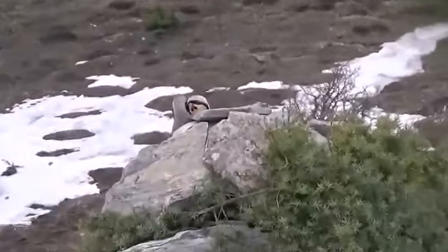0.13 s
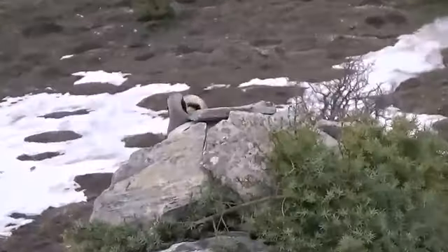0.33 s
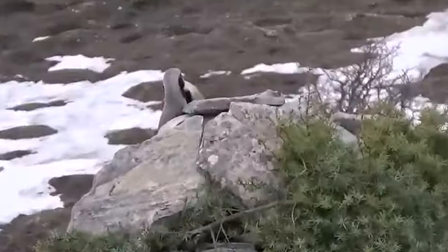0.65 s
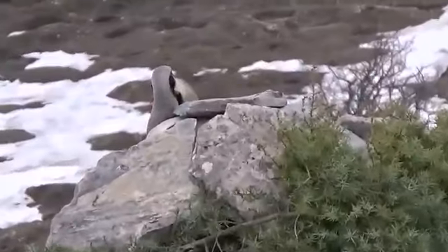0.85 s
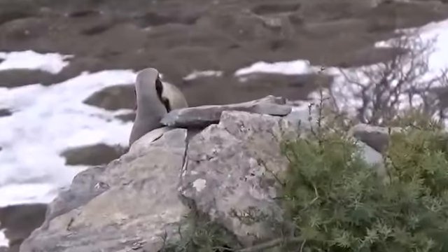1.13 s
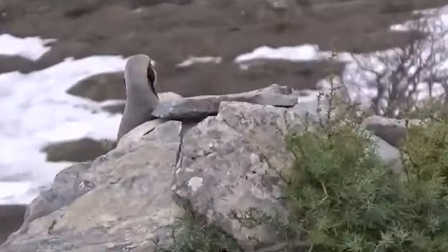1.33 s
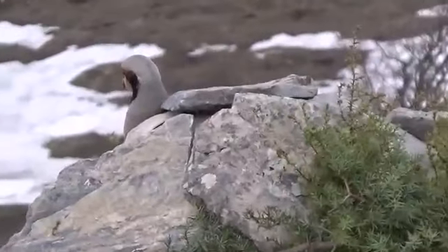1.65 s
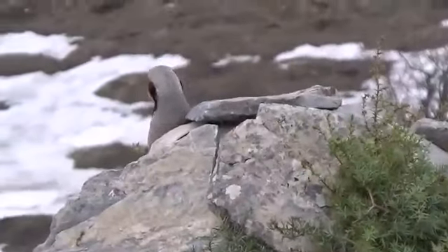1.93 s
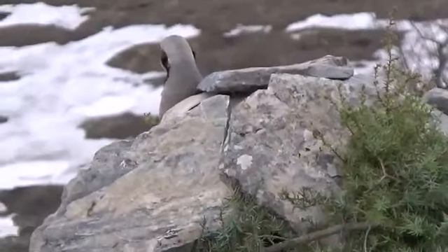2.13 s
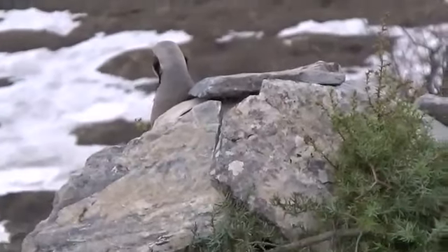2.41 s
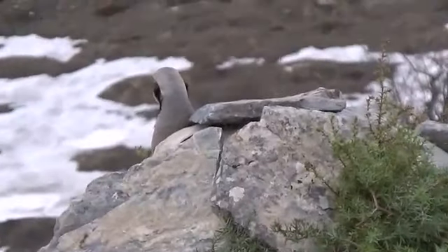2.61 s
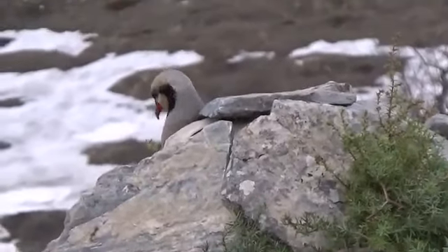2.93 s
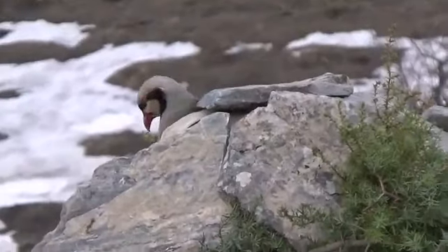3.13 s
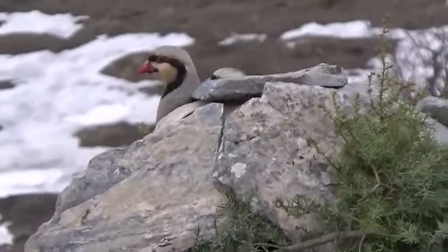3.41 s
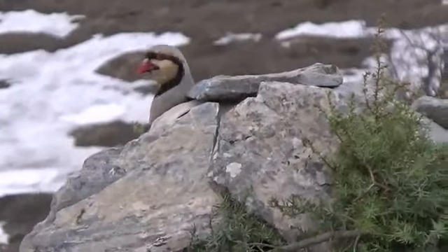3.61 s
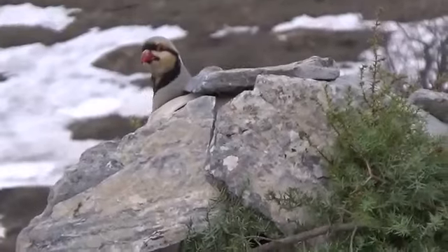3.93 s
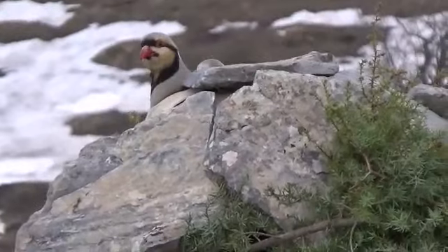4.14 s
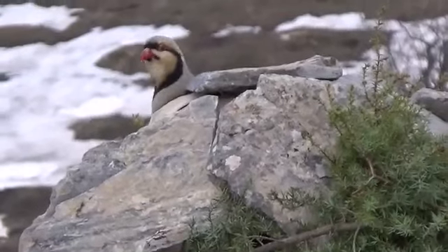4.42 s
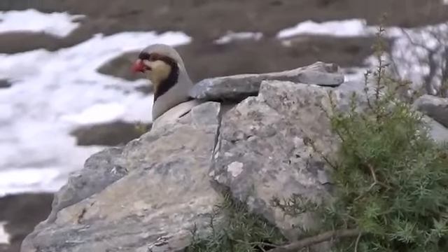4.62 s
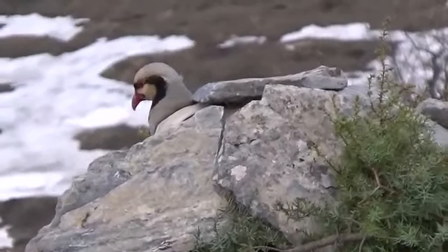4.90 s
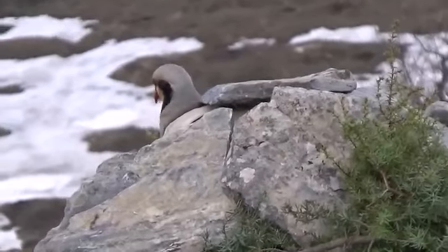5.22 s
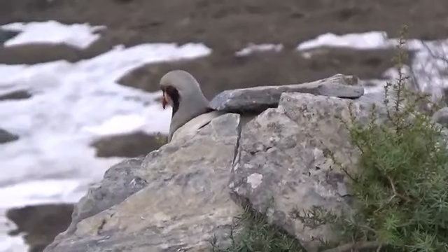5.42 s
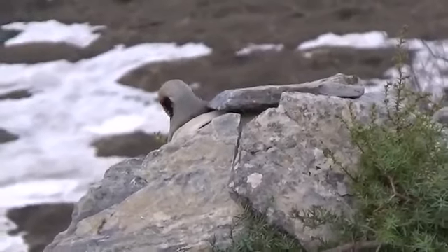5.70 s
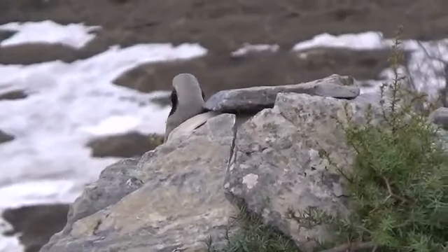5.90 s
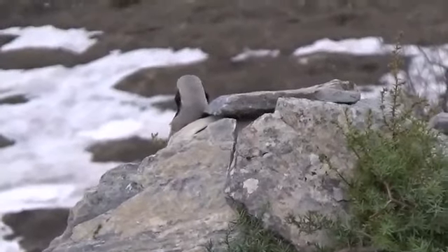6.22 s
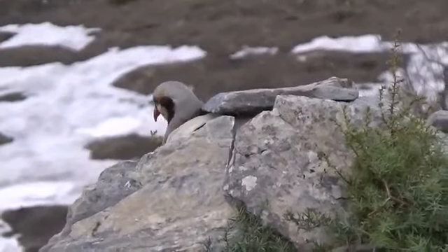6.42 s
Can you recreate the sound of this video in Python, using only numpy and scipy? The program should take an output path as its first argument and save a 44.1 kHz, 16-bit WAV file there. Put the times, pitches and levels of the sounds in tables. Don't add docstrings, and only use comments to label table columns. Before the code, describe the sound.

Two partridges trade harsh, rasping whistled notes across a quiet open mountainside, the louder bird fading while faint hiss and sharp camera ticks continue.

```python
import sys
import numpy as np
from scipy import signal
from scipy.fft import rfft, irfft, next_fast_len
from scipy.io import wavfile
from scipy.ndimage import uniform_filter1d

SR = 44100
rng = np.random.default_rng(int(sys.argv[2]) if len(sys.argv) > 2 else 0)


def wav_out(sig):
    wavfile.write(sys.argv[1], SR, np.round(np.clip(np.atleast_2d(sig).T, -1, 1) * 32767).astype(np.int16))


def how_loud(loudness_db):
    steps = np.asarray(loudness_db, float) / 20
    return 10 ** steps


N = 288855

# f/Hz, level/dB
THROAT = [(900, -85), (1300, -6.5), (1600, 1), (2600, 2.5), (3600, 10.5), (4200, -5.5), (4800, 0.5),
          (6000, -9), (6600, -19), (8200, -5), (11000, -5.5)]
IDLE_SLIPS = 65


def evened(x):
    return x / np.sqrt(np.mean(x ** 2) + 1e-20)


def read(points, hz):
    f, value = np.transpose(points)
    return np.interp(np.log(hz + 1), np.log(f + 1), value)


def add(mix, s, sound):
    part = mix[..., max(round(s * SR), 0):][..., :sound.shape[-1]]
    part += sound[..., :part.shape[-1]]


def wander(size, smooth):
    rough = uniform_filter1d(rng.standard_normal(size), int(smooth))
    return evened(uniform_filter1d(rough, int(smooth)))


def resonate(x, hz, width):
    turn = np.exp(2j * np.pi * np.cumsum(hz * np.ones(len(x))) / SR)
    r = np.exp(-np.pi * width / SR)
    return 2 * (turn * signal.lfilter([1 - r], [1, -r], x / turn + 1e-18)).real


def spread(x, pan_db):
    return x * how_loud(np.array([[pan_db / 2], [-pan_db / 2]]))


def air():
    # f/Hz, level/dB per Hz
    hiss = [(24, -60), (40, -23), (120, -14), (608, -3.5), (685, -6), (1270, -7.5), (1370, -8), (9450, -18),
            (11200, -18), (12000, -58), (15600, -88), (22000, -120)]
    # f/Hz, left-right correlation
    same_points = [(400, 0.82), (1400, 0.018), (4000, 0.39), (11000, 0.72)]
    # t/s, level/dB
    gust = [
        (0, 5.5),
        (3.3, 3),
        (4, 6),
        (4.45, 7),
        (4.9, 2),
        (6.55, 0.5),
    ]
    # f/Hz, share of the swell
    gust_reach = [(100, 0.39), (300, 0.99), (900, 0.9), (2500, 0.51)]
    frames, hz = N // 256 + 5, np.fft.rfftfreq(1024, 1 / SR)
    a, b, c, d, patches = rng.standard_normal((frames, 513, 5)).T
    patches = evened(uniform_filter1d(uniform_filter1d(patches, 12, 0), 14, 1))
    swell_db = np.interp(np.arange(frames) * 256 / SR, *np.transpose(gust))
    same = np.clip(read(same_points, hz), -1, 1)[:, None]
    left = a + 1j * b
    right = same * left + np.sqrt(1 - same ** 2) * (c + 1j * d)
    wind_db = read(gust_reach, hz)[:, None] * (1.88 * patches + swell_db)
    z = np.array([left, right]) * how_loud(read(hiss, hz)[:, None] + wind_db)
    return how_loud(-62) * evened(signal.istft(z, nperseg=1024, noverlap=768)[1][:, :N])


def whistle(row, manner, rule):
    s, length, from_hz, to_hz, db = row
    slips, arch, swell_db = manner
    ends_db, under_db, lift_db, weak = rule
    firm_db = -43.5
    u = np.arange(9) / 8
    ends = (2 * u - 1) ** 2
    hz = (from_hz + (to_hz - from_hz) * u) * (1 + arch * (1 - ends))
    level_db = db + swell_db * (u - .5)
    rasp_db = level_db + under_db + lift_db * ends + weak * max(firm_db - db, 0)
    loose = np.interp(length * u, (.012, .02), (.15, 1))
    return np.transpose([s + length * u, hz, level_db - ends_db * ends, rasp_db, loose]), slips


def tail(row, rule):
    s, length, from_hz, db, whistle_db = row
    rising, first_db, fade_db, kept, last = rule
    times = s + length * np.array([0, rising, 1])
    hz = from_hz * np.array([1, kept, last])
    level_db = db - np.array([first_db, 0, fade_db])
    return np.transpose([times, hz, level_db + whistle_db, level_db, [1, 1, 1]]), 0


def lead(row, rule):
    s, length, top_hz, db, rasp_db = row
    low_hz, rise_db, rising, climb = rule
    times = s + length * np.array([0, rising, 1])
    hz = low_hz + (top_hz - low_hz) * np.array([0, climb, 1])
    level_db = db - np.array([rise_db, 0, 0])
    return np.transpose([times, hz, level_db, level_db + rasp_db, [1, 1, 1]]), IDLE_SLIPS


def breaths(parts):
    join_s = .042
    notes = []
    for rows, slips in sorted(parts, key=lambda part: part[0][0, 0]):
        if notes and slips != IDLE_SLIPS and rows[0, 0] - notes[-1][0][-1, 0] < join_s:
            before, earlier = notes.pop()
            before = before[before[:, 0] < rows[0, 0]]
            rows, slips = np.vstack([before, rows]), slips or earlier
        notes.append((rows, slips or IDLE_SLIPS))
    return notes


def rasp_drive(size, hz):
    turns = np.cumsum(hz * np.exp(0.18 * wander(size, 60))) / SR + rng.random()
    pulses = np.diff(np.floor(turns), prepend=np.floor(turns[0]))
    puffs = np.exp(-(turns % 1) / 1.1) * rng.standard_normal(size)
    return evened(pulses) + 0.52 * evened(puffs)


def strands(size, hz):
    pitch = hz * np.exp(.09 * wander(size, 304.7))
    turns = np.cumsum(pitch * (1 + .02 * wander(size, 42.3))) / SR
    k = np.arange(2, 11)[:, None]
    flare_db = 7.5 * np.array([wander(size, 490) for _ in k])
    heights = how_loud(read(THROAT, k * pitch) + flare_db)
    heights /= np.sqrt((heights ** 2).sum(0) / 2)
    return (heights * np.cos(2 * np.pi * k * turns)).sum(0)


def note(rows, slips, voice):
    # f/Hz, level/dB
    beak = [(1000, -31), (1500, 9.5), (5800, -0.5), (7000, -15), (8000, -12.5)]
    depth, pulse_hz, *overtones_db, pan_db = voice
    s, *columns = np.transpose(rows)
    t = np.arange(s[0], s[-1], 1 / SR)
    path_hz, tone_db, rasp_db, loose = (np.interp(t, s, c) for c in columns)
    rivalry_db = rasp_db - tone_db

    broken = np.clip((rivalry_db + 5) / 9, 0, .28)
    shaky = np.clip((rivalry_db + 19) / 16 + abs(np.gradient(path_hz)) / 2, .1, 1)
    smooth_hz = uniform_filter1d(path_hz, 100)
    hz = smooth_hz * (1 + .02 * shaky * wander(len(t), 130))

    haste_db = np.minimum(0.29 * (rivalry_db + 8) + .4 * (tone_db.max() - tone_db - 4), 5)
    rate = slips * loose * how_loud(haste_db) * np.exp(.19 * wander(len(t), 300))
    count = np.cumsum(rate) / SR + rng.random()
    jump = np.clip((count % 1 - .5) * np.maximum(420 / rate, 1.3) + .5, 0, 1)
    slip = (1 + depth * np.exp(2j * np.pi * jump)) / (1 + depth)

    turns = np.cumsum(hz) / SR
    tone = (slip * np.exp(2j * np.pi * turns)).real
    slide_db = 6 * np.minimum(abs(np.gradient(hz)), 2)
    blur_db = 3.5 * np.log2(np.maximum(rate / 60, .7))
    for k, db in zip((.5, 1.5, 2, 3), overtones_db):
        flare_db = np.maximum(shaky, .45) * (6 * np.tanh(wander(len(t), 220)) - 4) - slide_db
        height = how_loud(db + flare_db + read(beak, k * hz) - blur_db * (k * hz > 6050))
        tone += height * (slip * np.exp(2j * np.pi * k * turns)).real
    tone *= how_loud(4 * shaky * np.tanh(wander(len(t), 110)))

    drive = rasp_drive(len(t), pulse_hz)
    struck = evened(resonate(resonate(drive, hz, 1100), hz, 1100))
    tone = np.sqrt(1 - broken) * 1.35 * tone + np.sqrt(broken) * struck

    throat_gain = how_loud(read(THROAT, np.fft.rfftfreq(len(t), 1 / SR)))
    puffs = irfft(rfft(drive) * throat_gain, len(t))
    rasp = strands(len(t), pulse_hz) + how_loud(-5) * evened(puffs) * (1.7 - abs(slip))
    leap_db = -abs(np.gradient(smooth_hz))
    sound = how_loud(tone_db + leap_db + 1.5) * tone + how_loud(rasp_db - 3.5) * rasp
    edges = np.clip(np.minimum(t - t[0] + (t[0] < .001), t[-1] - t) / .003, 0, 1)
    return s[0], spread(sound * edges, pan_db)


def calls():
    # slip depth, rasp pulses f/Hz, level/dB at 0.5, 1.5, 2 and 3 times the whistle, left-right/dB
    high_voice = (.6, 620, -84, -34, -10, -22, -0.5)
    low_voice = (1.3, 700.5, -83.5, -16.5, -4.5, -9.5, -0.4)
    # t/s, length/s, from f/Hz, to f/Hz, level/dB
    high_whistles = [(0, 0.014, 3740, 3620, -40), (0.028, 0.028, 3760, 3740, -39),
                     (0.066, 0.017, 3574, 3822, -36.5), (0.322, 0.047, 3925, 4110, -32),
                     (0.371, 0.01, 4554, 4560, -34), (.384, .006, 3916, 3670, -31.5),
                     (0.628, 0.042, 4120, 4290, -42), (0.675, 0.016, 4114, 3664, -30.5),
                     (1.035, 0.01174, 3565, 4016, -45.5), (1.05, 0.024, 4480, 4490, -41),
                     (1.335, 0.011, 3570, 4040, -36.5), (1.346, 0.04, 4510, 4500, -35.5),
                     (1.379, 0.019, 3990, 3985, -36), (1.744, 0.0073, 3583, 3970, -47),
                     (1.755, 0.017, 4750, 4850, -45), (1.777, 0.0079, 4080, 3970, -38.5),
                     (2.007, 0.015, 2960, 3500, -46), (2.027, 0.04, 3936, 4230, -50),
                     (2.074, 0.01, 3170, 2890, -42.5), (2.432, .006, 2550, 2640, -44),
                     (2.446, 0.015, 4230, 2848, -39), (2.461, .006, 3890, 3460, -38),
                     (3.662, 0.0064, 2450, 2510, -48.5), (3.67, 0.0049, 3340, 3400, -42),
                     (3.675, 0.0079, 2560, 2540, -44.5), (3.691, 0.0083, 3690, 3940, -48),
                     (3.968, 0.0099, 3804, 4265, -38.5), (3.98, .021, 3970, 4200, -37.5),
                     (4.534, .011, 3180, 3010, -51), (4.547, 0.013, 3740, 4050, -54),
                     (4.569, .008, 3700, 2700, -59), (4.848, 0.036, 4070, 3590, -56.5),
                     (5.244, .015, 2314, 2274, -58), (5.264, .006, 3980, 4160, -61),
                     (5.272, 0.012, 2340, 2280, -56)]
    low_whistles = [(0, 0.046, 3130, 3110, -47.5), (2.156, 0.048, 3017, 3020, -40),
                    (2.558, 0.065, 2750, 2884, -39), (2.932, 0.063, 2927, 3020, -42.5),
                    (3.317, 0.041, 3046, 3000, -40.5), (3.375, 0.019, 2570, 3100, -47.5),
                    (3.738, 0.093, 3047, 2772, -35), (4.141, 0.013, 2410, 2730, -40.5),
                    (4.153, 0.063, 2822, 2644, -40), (4.641, .013, 2577, 2730, -46.5),
                    (4.655, 0.0154, 3430, 3290, -45.5), (4.672, 0.014, 2960, 2430, -43),
                    (5.015, 0.067, 3047, 2923, -39), (5.397, 0.069, 2977, 2973, -38.5),
                    (5.8, 0.056, 3090, 2985, -48), (6.128, 0.047, 3090, 2960, -42.5)]
    # slips/Hz, arch as share of pitch, swell from start to end/dB
    high_manner = [(200, -0.014, -9), (60, 0.049, -5), (59.8, -0.0016, -4), (26, 0.011, -5.5),
                   (26.8, 0.012, 2), (27, 0.011, 3), (87.3, 0.065, -9.5), (89.2, 0.011, 5.5),
                   (40, -0.0065, -1), (39.6, -0.0056, 6), (41, 0.013, -3), (42, 0.019, -5),
                   (42.7, -0.0044, 0), (68, 0.0016, -2), (68.4, -0.019, 10), (59, -0.0066, 0),
                   (42, 0.0014, -1), (42.2, .03, 2.5), (38.8, 0.0044, -6), (60, -0.015, 16), (67, 0.09, 10),
                   (64, 0.0035, 14), (70, 0.01, 8), (71, 0.062, -3), (72, 0.0047, 9), (73, 0.11, 1),
                   (50, -0.0023, -4), (51.5, -0.04, 1), (100, -0.014, -5), (101, 0.008, -16),
                   (105, 0.0044, -5), (60, 0.0054, -5.5), (80, 0.018, -1), (81, -0.012, -4),
                   (82.5, 0.0025, 0)]
    low_manner = [(72, 0.0027, -2), (206.3, 0.0052, -3), (257.6, 0.1, -3), (258.2, 0.0042, -0.5),
                  (29, 0.0588, -12), (28.85, 0.0052, 9), (265, 0.01985, -8.5), (60, .01, 6),
                  (340, 0.042, -0.5), (60, 0.021, -10), (61, 0.022, 1), (63.2, 0.016, 3),
                  (64.4, 0.071, -7.5), (293, .075, -3.5), (259.3, 0.0023, -4.5), (171, 0.0216, -5)]
    # t/s, length/s, from f/Hz, rasp level/dB, whistle against it/dB
    high_tails = [(0.092, 0.061, 2500, -35.5, -2), (0.39, 0.06, 2820, -29.5, -7),
                  (0.691, 0.047, 2560, -31, -8), (1.091, 0.045, 2250, -40.5, -2.5),
                  (1.397, 0.058, 2530, -35, -10), (1.783, 0.1, 2730, -40.5, -9),
                  (2.087, 0.067, 2844, -47.5, -3), (2.468, 0.036, 2473, -39.5, -1.5),
                  (3.716, 0.0062, 2510, -43.5, -5), (4.013, 0.042, 2500, -43.5, -3.5),
                  (4.589, 0.034, 2360, -65, 5.5), (4.9, 0.033, 2210, -56.5, 3),
                  (5.283, 0.034, 2200, -60, 1.5)]
    low_tails = [(.135, 0.057, 1813, -53, 2.5), (0.544, 0.048, 1883, -50.5, -2),
                 (1.523, 0.059, 1963, -58.5, 1), (2.206, 0.04, 1950, -48, 2.5),
                 (2.645, 0.041, 1620, -49, -5), (3.007, 0.036, 1538, -56.5, 3.5),
                 (3.408, 0.053, 1935, -44.5, -3.5), (3.836, 0.04, 1644, -46.5, 4),
                 (4.228, 0.033, 2634, -41, -4), (4.691, 0.026, 1927, -46.5, 4),
                 (5.096, 0.041, 1694, -48.5, -4.5), (5.471, 0.049, 2010, -56, 4),
                 (5.861, 0.042, 1856, -51.5, 0.5), (6.184, 0.055, 1906, -52.5, 1.5)]
    # t/s, length/s, reached f/Hz, whistle level/dB, rasp against it/dB
    high_leads = [(.298, 0.016, 2970, -36, 2.5), (0.61, 0.015, 3067, -38.5, 2), (1.019, .014, 2650, -47, 2),
                  (1.315, 0.0083, 2048, -44.5, -0.5), (1.72, 0.02, 3142, -48.5, 0),
                  (1.991, 0.011, 1900, -50.5, 1), (2.409, 0.022, 3254, -43, -11.5),
                  (3.646, 0.0091, 2396, -52, 0), (3.936, 0.027, 2703, -47, -3),
                  (4.519, 0.0087, 1600, -46, -15), (4.799, 0.031, 1692, -56.5, -1.5),
                  (5.228, 0.0086, 2480, -56.5, -9)]
    low_leads = [(.778, 0.017, 2650, -44, -12.5), (0.805, 0.015, 2700, -45.5, -4),
                 (1.191, 0.017, 2630, -41.5, -1), (1.221, 0.015, 2680, -45, -7),
                 (1.477, 0.036, 1729, -43.5, -4), (2.125, 0.029, 2050, -42.5, -15),
                 (2.533, 0.01935, 1767, -48, -11.5), (2.893, 0.025, 1626, -48, -4),
                 (3.254, 0.056, 1955, -47.5, 2.5), (3.704, 0.025, 2293, -39.5, -4.5),
                 (4.123, 0.017, 1790, -42.5, -9.5), (4.632, 0.008, 2410, -46, -5.5),
                 (4.984, .025, 1965, -48, -4.5), (5.372, 0.022, 2274, -47, -9),
                 (5.756, 0.024, 1850, -49.5, -3.5), (5.784, 0.014, 2216, -43, -10),
                 (6.09, 0.013, 1720, -59, 6), (6.109, 0.015, 2087, -43.5, -15)]
    # loss at both ends/dB, rasp under the middle/dB, rasp gain at the ends/dB, rasp gain per dB of weakness
    high_hold, low_hold = (2.5, -23.5, 11, 0.63), (5, -17, 6, 1.6)
    # share of length before the rasp peaks, start below the peak/dB, fade/dB, pitch share at the peak and
    high_end, low_end = (0.2035, 1.1, 21.2, .9, .76), (0.133, 0.46, 12.6, .95, .8)
    # f/Hz, rise/dB, share of the length spent rising, share of the climb made by then
    high_start, low_start = (1600, 6.3, 0.4526, 0.507), (1500, 11.5, 0.86, 0.399)
    high = high_voice, high_leads, high_whistles, high_manner, high_tails, high_start, high_hold, high_end
    low = low_voice, low_leads, low_whistles, low_manner, low_tails, low_start, low_hold, low_end
    for voice, leads, whistles, manners, tails, start, hold, end in (high, low):
        parts = [lead(row, start) for row in leads]
        parts += [tail(row, end) for row in tails]
        parts += [whistle(row, manner, hold) for row, manner in zip(whistles, manners)]
        for rows, slips in breaths(parts):
            yield note(rows, slips, voice)


def camera():
    # t/s, treble peak level/dB, middle and bass against it/dB
    ticks = [(0.0598, -38.5, -17, -30), (0.894, -37.5, -17, -39), (1.65, -39, -4, -31.5),
             (1.9003, -21, -4, -26.5), (2.9976, -34, -21, -21), (3.6504, -27, -12.5, -39),
             (5.3074, -33.5, -12.5, -20), (5.354, -41.5, -13, -24), (5.413, -55, 12, 14.5),
             (5.5397, -26.5, -12.5, -5.5), (5.5888, -36.5, -14, -30), (5.6297, -43.5, -18, -29),
             (5.8701, -45.5, -8, -8), (6.3767, -24.5, -20, -25), (6.3907, -21, -15, -29),
             (0.71, -35, -12, -30), (2.108, -42, -20, -30), (3.894, -45, -8, -25.5),
             (4.064, -45.5, -14, -25), (4.335, -48, -15, -23.5), (5.333, -44.5, -15, -25),
             (5.845, -45, -20, -24)]
    # from f/Hz, to f/Hz, t60/s
    shell = [
        (5400, 20500, 0.0074),
        (1290, 3600, 0.039),
        (352, 970, 0.0041),
    ]
    mix, t = np.zeros((2, N)), np.arange(1600) / SR
    for s, db, middle_db, bass_db in ticks:
        tick = np.zeros(len(t))
        for (lo_hz, hi_hz, t60), level_db in zip(shell, (db, db + middle_db, db + bass_db)):
            snap = rng.standard_normal(len(t)) * how_loud(-60 * t / t60) * np.minimum(t / 0.0001, 1)
            band = signal.butter(2, (lo_hz, hi_hz), "band", fs=SR, output="sos")
            rung = signal.sosfilt(band, snap)
            tick += how_loud(level_db) * rung / abs(rung).max()
        add(mix, s - .0005, spread(tick, rng.uniform(-3, 3)))
    return mix


def lock(s, length, from_hz, to_hz, db):
    u = np.linspace(-1, 1, round((length + 0.00304) * SR))
    hz = from_hz + (to_hz - from_hz) * (u + 1) / 2 + 55 * wander(len(u), 60)
    turns = np.cumsum(hz) / SR
    tone = np.cos(2 * np.pi * turns) + how_loud(-17) * np.cos(4 * np.pi * turns)
    return s - .0015, how_loud(db + 6.5 + 2.5 * wander(len(u), 65)) * tone * np.sqrt(1 - u ** 4)


def cluck(s, hz, db):
    # f/Hz, level/dB
    cluck_colour = [(450, 1), (950, 10), (1400, 11.5), (2200, 13), (4800, -40), (6000, -34)]
    half = 0.019
    u = np.linspace(-1, 1, round(2 * half * SR))
    pitch = hz * (1 - 0.063 * u) * (1 + 0.047 * wander(len(u), 132))
    turns = np.cumsum(pitch) / SR
    stack = np.zeros(len(u))
    for k in range(1, 15):
        dull_db = .5 * np.log2(k) * min(db + 48, 0)
        stack += how_loud(read(cluck_colour, k * pitch) + dull_db) * np.cos(2 * np.pi * k * turns)
    return s - half, how_loud(db) * stack * (1 - u ** 2) ** 0.66


def mutter(s, hz, db):
    half = 0.022
    u = np.linspace(-1, 1, round(2 * half * SR))
    drive = rasp_drive(len(u), 510)
    body = np.zeros(len(u))
    for k in range(4):
        ring_hz = hz * (1 + 0.63 * k)
        body += how_loud(-7 * k) * evened(resonate(resonate(drive, ring_hz, 600), ring_hz, 600))
    return s - half, how_loud(db) * body * (1 - u ** 2)


def rock_scatter(mix):
    t = np.arange(4000) / SR
    sparse = rng.standard_normal((2, 4000)) * (rng.random((2, 4000)) < .05)
    rocks = sparse * how_loud(-60 * t / 0.17) * (t > .003)
    return how_loud(-18) * signal.fftconvolve(mix, rocks / np.linalg.norm(rocks[0]), axes=1)[:, :N]


def ports(mix):
    # f/Hz, left-right/dB
    port_db = [(1000, 0), (2000, -4), (3600, -0.5), (6500, 1)]
    # f/Hz, left lead/rad
    port_lead = [(1460, -0.28), (3600, 0.71), (4400, -1.13), (5300, 0.88), (6500, 0.77)]
    size = next_fast_len(N)
    hz = np.fft.rfftfreq(size, 1 / SR)
    port = how_loud(read(port_db, hz) / 2) * np.exp(.5j * read(port_lead, hz))
    return irfft(rfft(mix, size) * np.array([port, 1 / port]), size)[:, :N]


def birds():
    # t/s, length/s, from f/Hz, to f/Hz, level/dB
    locks = [(0.066, 0.026, 2970, 3070, -48), (0.091, 0.012, 1983, 1780, -40.5),
             (0.105, 0.024, 1520, 1253, -54.5), (0.114, 0.02, 4740, 4840, -54),
             (0.115, 0.025, 3160, 3200, -55), (0.156, 0.01, 1510, 1570, -53),
             (0.159, 0.0076, 3200, 3200, -57), (0.304, 0.01, 1940, 1990, -46),
             (0.313, 0.01, 2760, 3200, -38.5), (0.392, 0.027, 1996, 1666, -45),
             (0.406, 0.012, 3050, 2930, -49), (0.639, 0.037, 4140, 3720, -50.5),
             (0.712, 0.027, 2320, 1960, -53), (0.792, 0.0085, 2540, 2650, -54),
             (0.812, 0.016, 2370, 2710, -50), (1.083, 0.012, 2865, 2410, -49),
             (1.084, 0.0045, 5600, 5050, -47), (1.207, 0.009, 2560, 2660, -51.5),
             (1.228, 0.013, 2480, 2640, -53), (1.317, 0.016, 1890, 2000, -48),
             (1.436, 0.019, 2270, 1910, -55), (1.771, 0.031, 1596, 2080, -48),
             (1.772, 0.011, 3150, 3540.0, -54), (1.776, 0.013, 4140, 3880, -54),
             (1.804, 0.027, 3050, 3140, -48), (1.842, 0.014, 1480, 1480, -57),
             (1.997, 0.016, 1684, 2470, -55), (2.082, 0.029, 2104, 1830, -52),
             (2.08, 0.01, 4800, 4700, -57), (2.485, 0.011, 3740, 4000, -56),
                  (2.534, 0.035, 1434, 2100, -58), (2.636, 0.026, 1868, 1350, -55),
                  (2.638, 0.019, 3470, 2920.0, -54), (2.909, 0.022, 1513, 2110, -52.5),
                  (2.952, 0.015, 3820, 3750.0, -54), (2.963, 0.016, 2560.0, 2510, -53),
                  (2.979, 0.0085, 1540, 1470.0, -53.5), (3.291, 0.019, 2650, 2470, -50),
                  (3.321, 0.015, 2470, 2000, -51), (3.401, 0.0062, 1810, 2040, -44.5),
                  (3.4, 0.0073, 3730, 4090, -51), (3.407, 0.013, 3110, 3040, -47),
                  (3.423, 0.012, 4090, 4000, -57), (3.699, 0.023, 2420, 2590, -49.5),
                  (4.006, 0.012, 2640, 2460, -49.5), (4.017, 0.014, 1543, 1274, -52.5),
                  (4.123, 0.0362, 1456, 1944, -53), (4.161, 0.016, 1480, 1790.0, -55.5),
                  (4.198, 0.01, 4100, 3720, -48.5), (4.22, 0.019, 2025, 1740, -54),
                  (4.234, 0.013, 1507, 1516, -51), (4.59, 0.024, 1445, 1540, -60),
                  (4.591, 0.015, 2320, 2450, -60.5), (4.724, 0.0079, 1800, 2250.0, -56.5),
                  (5.471, 0.0088, 1930, 1940, -52.5)]
    # t/s, f/Hz, level/dB
    clucks = [(0.121, 453, -54), (0.427, 465, -54.5), (0.725, 442, -57.5), (0.967, 400, -61),
              (1.109, 455, -58), (1.427, 463.5, -55), (1.817, 450, -57.5), (2.116, 457, -60),
              (2.486, 438, -62.5), (2.992, 417, -65), (3.586, 412, -62), (4.031, 449, -59.5),
              (4.244, 466, -64), (4.575, 416, -61.5), (4.922, 410, -60.5), (5.15, 413, -66),
              (5.301, 409, -65.5), (5.89, 398, -65), (6.247, 409, -64)]
    # t/s, f/Hz, level/dB
    mutters = [(0.854, 1580, -54.5), (1.266, 1861, -61.5), (1.6, 1670, -60.5), (1.656, 2100, -61),
               (2.352, 1680, -59.5), (2.757, 1260, -57), (3.532, 2090, -61.5), (4.351, 1990, -62),
               (6.339, 1470, -55.5), (4.262, 1950, -52), (5.975, 1130, -65.5)]
    mix = np.zeros((2, N))
    for s, sound in calls():
        add(mix, s, sound)
    for row in locks:
        add(mix, *lock(*row))
    for row in clucks:
        add(mix, *cluck(*row))
    for row in mutters:
        add(mix, *mutter(*row))
    return ports(mix + rock_scatter(mix))


def scene():
    return air() + birds() + camera()


def top_cut(x):
    return signal.sosfilt(signal.butter(12, 12310, fs=SR, output="sos"), x)


def record(dry):
    low_cut = signal.butter(2, 70, "high", fs=SR, output="sos")
    dry = signal.sosfilt(low_cut, dry)
    band_limit = signal.firwin(401, 11024, window=("kaiser", 6), fs=SR)
    kept = signal.oaconvolve(dry, band_limit[None], "same")
    return top_cut(kept + how_loud(-26) * (dry - kept))


dry = scene()
out = record(dry)
wav_out(out)
```